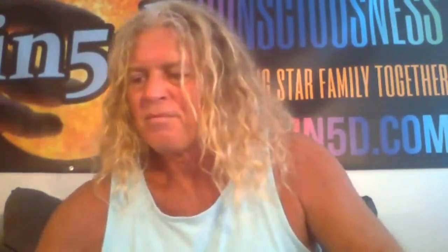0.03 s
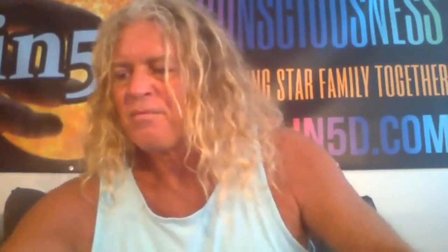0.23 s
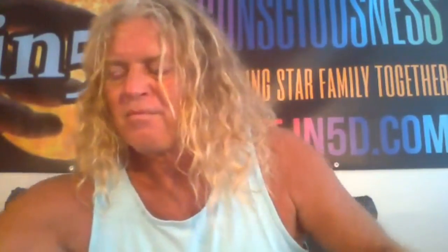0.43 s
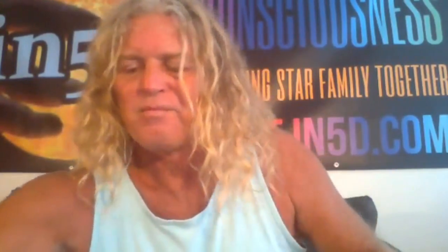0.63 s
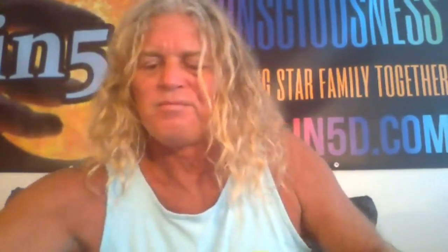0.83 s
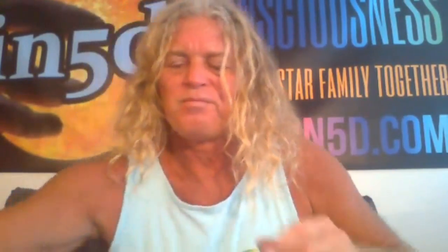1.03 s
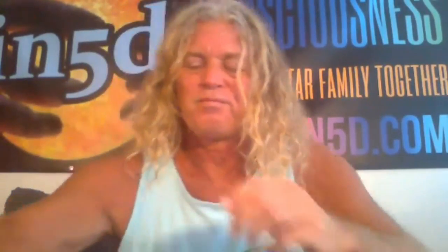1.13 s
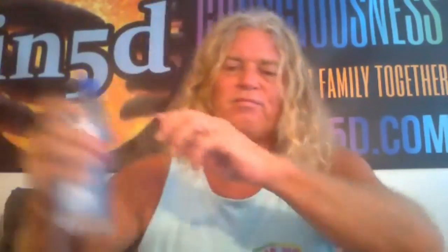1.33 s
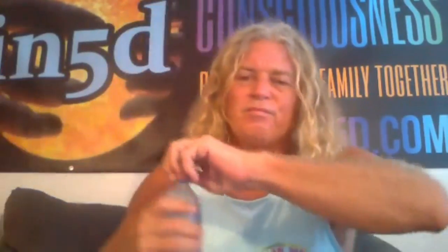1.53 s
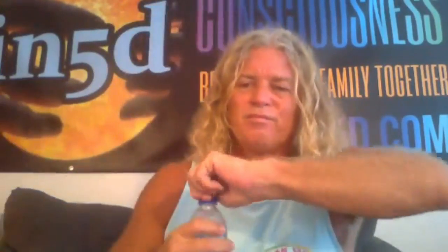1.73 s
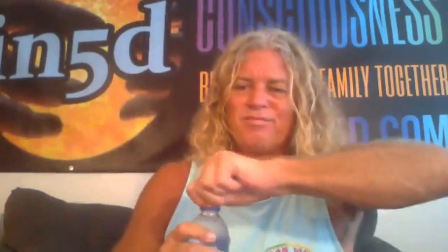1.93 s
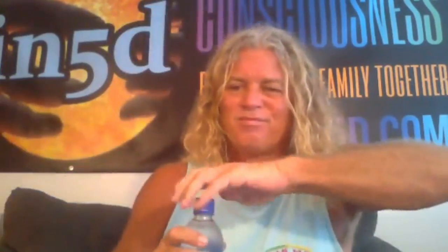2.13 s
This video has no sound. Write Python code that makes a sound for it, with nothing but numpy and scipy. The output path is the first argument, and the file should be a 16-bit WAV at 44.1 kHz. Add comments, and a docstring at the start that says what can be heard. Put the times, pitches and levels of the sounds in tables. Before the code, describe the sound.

A plastic bottle is picked up and opened near the microphone in a quiet room. A dull desk thud and scattered crackles come first, followed by the sharp snap of the seal and the cap's quick clicking twist.

```python
"""A faint rustle and a low boom sound over room noise as a plastic bottle is picked up from a desk.
Its thin wall buckles in crackles, its body rings in damped modes and a dent springs back. A soft thud
sets the desk swinging and rattling. Then the screw cap is twisted open: the seal snaps and the cap
chatters along its thread by stick-slip friction, all in a quiet room near a laptop microphone."""
import sys
import numpy as np
from scipy import signal
from scipy.fft import rfft, irfft, next_fast_len
from scipy.io import wavfile
from scipy.ndimage import uniform_filter1d, map_coordinates

SR = 44100
rng = np.random.default_rng(int(sys.argv[2]) if len(sys.argv) > 2 else 0)


def put_to_file(sound):
    """Save the sound as 16-bit audio at rate SR, in the file named by the first command-line argument."""
    columns = np.atleast_2d(sound).T  # one column per channel
    safe = np.clip(columns, -1, 1)
    whole_steps = np.round(safe * 32767)
    wavfile.write(sys.argv[1], SR, whole_steps.astype(np.int16))


N = 97020


def amp(db):
    """Amplitude ratio of a level in decibels."""
    return 10 ** (np.asarray(db) / 20)


def unit(x):
    """Normalisation to an rms of 1."""
    return x / np.sqrt(np.mean(x ** 2) + 1e-20)


def along(points, hz):
    """Interpolation of (frequency [Hz], value) points on a logarithmic frequency axis."""
    f, values = np.transpose(points)
    return np.interp(np.log(hz + 1), np.log(f + 1), values)


def envelopes(rows):
    """Amplitude envelopes, one per level column of (time [s], level [dB], ...); the end values hold."""
    times, *columns = np.transpose(rows)
    return [amp(np.interp(np.arange(N) / SR, times, db)) for db in columns]


def filtered(x, response):
    """Linear filtering: the spectrum is multiplied by a frequency response."""
    size = next_fast_len(len(x) + 8192)
    return irfft(rfft(x, size) * response(np.fft.rfftfreq(size, 1 / SR)), size)[:len(x)]


def resonance(f, hz, width_hz):
    """Band-pass response of a damped second-order resonator."""
    return 1j * f * width_hz / (hz * hz - f * f + 1j * f * width_hz)


def add(track, start, sound):
    """Superposition of a sound on a track from a start time in seconds."""
    part = track[round(start * SR):][:len(sound)]
    part += sound[:len(part)]


def ring(modes, rise_s, scatter_db, sign=1):
    """Free vibration after a blow: a sum of exponentially damped modes."""
    t = np.arange(SR) / SR
    partials = (sign ** k * amp(db + scatter_db * rng.normal() - 60 * t / t60)
                * np.sin(2 * np.pi * hz * t) for k, (hz, db, t60) in enumerate(modes))
    return (1 - np.exp(-t / rise_s)) * sum(partials)


def patchy_noise(spectrum, patchy_db):
    """Coloured noise, modulated by random patches of gain in time and frequency."""
    bins = signal.stft(rng.standard_normal(N), nperseg=512)[2]
    patches = uniform_filter1d(rng.standard_normal(bins.shape), size=14, axis=0)
    patches = uniform_filter1d(patches, size=6, axis=1)
    noise = signal.istft(bins * amp(patchy_db * unit(patches)), nperseg=512)[1][:N]
    return unit(filtered(noise, lambda f: amp(along(spectrum, f))))


def rustle():
    """Random amplitude modulation gives treble noise the grain of a rustle."""
    # Envelope of the rustle: (time [s], level [dB])
    levels = [(0, -57.5), (.06, -64.5), (.075, -50), (.105, -57.5), (.15, -48.5), (.2, -68), (.39, -68.5),
              (.55, -70.5), (.57, -68), (.7, -64), (.8, -71.5), (.85, -79.5), (1.0, -77.5), (1.03, -77),
              (1.06, -75.5), (1.4, -79), (1.46, -58), (1.56, -72.5), (1.62, -79), (2.2, -79.5)]
    # Spectral density of the rustle: (frequency [Hz], relative level [dB])
    spectrum = [(1470, -27), (2500, -16.5), (4340, -9), (5650, -4), (7080, -8), (9150, -0.5), (10100, -2.5),
                (15200, -6.5), (16000, -15)]
    grain_db, grain_s = 1.5, 0.0012
    grain = amp(grain_db * unit(uniform_filter1d(rng.standard_normal(N), size=round(grain_s * SR))))
    return envelopes(levels)[0] * unit(grain * patchy_noise(spectrum, patchy_db=2.0))


def room_noise():
    """The noise floor: a continuous spectrum with most of its power in the bass."""
    # Spectral density of the room noise: (frequency [Hz], relative level [dB])
    spectrum = [(15, -44), (35, -11), (52, -7), (66, 4), (90, -6.5), (150, -4), (300, -8.5), (450, -14),
                (840, -17.5), (1400, -20.5), (2760, -26), (4490, -36.5), (16000, -53.5)]
    # Envelope of the room noise: (time [s], level [dB])
    levels = [(0, -55.5), (.08, -59), (.59, -58), (.73, -57), (.95, -63), (1.2, -62.5), (1.79, -61),
              (1.91, -62), (2.2, -61.5)]
    return envelopes(levels)[0] * patchy_noise(spectrum, patchy_db=0.87)


def desk_boom(hz=127.6):
    """The desk booms on one low tone that comes and goes by slow amplitude modulation."""
    # Envelope of the boom: (time [s], level [dB])
    levels = [(0, -49.5), (.15, -79), (.33, -55), (.37, -66.5), (.55, -68), (.6, -48.5), (.65, -74),
              (.72, -56.5), (.76, -83), (.88, -60), (.92, -92), (1.07, -66), (1.14, -86), (1.3, -53.5),
              (1.4, -79), (1.46, -49), (1.51, -48), (1.56, -53), (1.6, -74), (1.7, -51.5), (1.8, -74),
              (1.86, -56.5), (1.95, -77), (2.06, -61), (2.2, -68.5)]
    return envelopes(levels)[0] * np.sqrt(2) * np.sin(2 * np.pi * hz * np.arange(N) / SR)


def wall_crackles():
    """Buckling of a thin shell: a click, then rough grains, excite a narrow ring and a broad crack."""
    # Buckles: (time [s], level [dB], ring frequency [Hz], ring bandwidth [Hz], crack re ring [dB],
    # crack lower edge [Hz], crack upper edge [Hz], hold [s], t60 [s])
    buckles = [(0.1563, -47, 3930, 500, 9.5, 630, 5500, 0.0015, 0.16),
               (0.1566, -40.5, 8760, 1500, 7, 1790, 15400, 0.0011, 0.083),
               (.3700, -56.5, 437, 193, 2.5, 198, 556, 0.037, 0.039),
               (0.5545, -62.5, 2580, 900, -2.5, 1500, 7140, 0.0016, 0.12),
               (0.658, -68, 6060, 900, -0.5, 4500, 14100, 0.0075, 0.023),
               (0.7118, -47.5, 1117, 298, -8.5, 613, 2330, 0.0009, 0.066),
               (0.725, -62.5, 2230, 199, -20, 1000, 3000, 0.021, 0.057),
               (1.105, -51, 8030, 700, 3, 7800, 16400, 0.0053, 0.018),
               (1.109, -77, 9300, 700, 12.5, 6400, 16200, 0.067, 0.035),
               (1.1513, -64, 10300, 900, -3, 6000, 14000, 0.0014, 0.029),
               (1.192, -52.5, 9700, 905, -16, 6000, 12100, 0.0025, 0.01),
               (1.2055, -54, 10760, 1490, -0.5, 6100, 12900, 0.0008, 0.0099),
               (1.229, -63.5, 2070, 790, 2, 1200, 3080, 0.0018, 0.016),
               (1.244, -68.5, 3380, 900, -2, 3000, 11200, 0.0015, 0.047),
               (1.413, -46.5, 1500, 880, -24, 1000, 3000, 0.0025, 0.006),
               (1.4163, -25, 1620, 865, -13, 5000, 16000, 0.00044, 0.0057),
               (1.4170, -44, 258, 160, -2, 220, 950, 0.013, 0.073),
               (1.4180, -38.5, 1640, 770, -7, 2200, 12400, 0.018, 0.078),
               (1.499, -50, 2160, 900, -20, 2000, 3970, 0.009, 0.013),
               (1.511, -50.5, 2280, 1190, -8.5, 2000, 7066, 0.0089, 0.071),
               (1.7698, -51, 2400, 910, -3.5, 1500, 7000, 0.003, 0.014),
               (1.774, -45, 2990, 400, -2.5, 1420, 9600, 0.0026, 0.11),
               (1.7897, -32.5, 2190, 806, -11, 1500, 6680, 0.0023, 0.0062),
               (1.9270, -35.5, 6360, 900, -4.5, 4000, 13300, 0.0017, 0.015),
               (2.01, -45.5, 970, 530, -3.5, 4650, 5420, 0.01, 0.11),
               (2.116, -63.5, 870, 510, -18, 520, 2090, 0.068, 0.028),
               (2.177, -54.5, 1800, 1180, -6, 1050, 4000, 0.013, 0.0055),
               (2.1843, -34, 5440, 590, -8, 1890, 5740, 0.0024, 0.022),
               (2.1970, -52.5, 5000, 890, 8, 1920, 8900, 0.0018, .03)]
    # Resonances of the wall: (frequency [Hz], bandwidth [Hz], level re the flat spectrum [dB])
    wall_modes = [(870, 50, 7), (1510, 67, 7.5), (2540, 130, 9), (3220, 310, 2), (4000, 280, 0.5),
                  (5680, 1300, 6.5), (8960, 980, 9), (9750, 1500, 5), (11800, 2300, 3.5)]
    scatter_db, click_db = 2, 12
    out, t = np.zeros(N), np.arange(SR // 4) / SR
    wall = lambda f: np.sqrt(1 + sum(np.abs(amp(db) * resonance(f, hz, width)) ** 2
                                     for hz, width, db in wall_modes))
    for start, db, hz, width, crack_db, bottom, top, hold, t60 in buckles:
        ring_band = lambda f: resonance(f, hz, width) ** 2
        crack_band = lambda f: wall(f) / (1 + (f / top) ** 8) / (1 + (bottom / (f + 1)) ** 4)
        decay = amp(-60 * np.maximum(t - hold, 0) / t60)
        grains = rng.standard_normal((2, len(t))) * amp(scatter_db * rng.exponential(size=(2, len(t))))
        for force, band, level_db in zip(grains, (ring_band, crack_band), (db, db + crack_db)):
            steady_rms = np.std(filtered(force, band))
            force[20] = amp(click_db)  # the opening click
            add(out, start, amp(level_db) * filtered(force * decay, band) / steady_rms)
    return out


def dent_pop():
    """Snap-through: a dent springs back once and leaves the wall ringing."""
    # Modes of the dent: (frequency [Hz], relative level [dB], t60 [s])
    modes = [(907, -6.5, 0.17), (1450, -4, 0.067), (1936, 3.5, 0.078), (2000, -4, 0.11), (2166, 2.5, 0.078),
             (2630, 2, 0.06), (3460, 1.5, 0.043), (4090, 6, 0.042)]
    out = np.zeros(N)
    add(out, start=0.1566, sound=amp(-38.5) * ring(modes, rise_s=0.0005, scatter_db=1.2, sign=-1))
    return out


def knocks_and_clicks():
    """Modal decay: each knock or click rings at its own pitch, and its higher modes die faster."""
    # Low hollow knocks and short high ringing clicks:
    # (time [s], level [dB], pitch [Hz], rise [s], t60 of the lowest mode [s], upper mode gain [dB])
    knocks = [(.1570, -50.5, 433, 0.0018, 0.12, 10.5), (0.714, -35.5, 392, 0.00053, 0.03, 2.5),
              (.724, -45, 323.4, 0.006, 0.15, 1.5), (1.417, -38.5, 221, 0.00098, 0.098, 1.5),
              (1.51, -26.5, 1857, 0.00075, 0.012, 8.5), (1.5254, -44, 1940, .0004, 0.0099, 3),
              (1.701, -57.5, 228.5, 0.0057, 0.2, -1.5), (1.997, -30.5, 2127, .0015, 0.039, -26)]
    # Modes of each knock or click: (frequency ratio [1], relative level [dB])
    mode_ratios = [(1, 4), (1.5, -5), (1.95, -10.5), (2.8, -14.5), (3.1, -3), (5.7, -10)]
    out = np.zeros(N)
    for start, db, hz, rise_s, t60, upper_db in knocks:
        modes = [(hz * ratio, mode_db + upper_db * (k > 0), t60 / ratio ** 1.9)
                 for k, (ratio, mode_db) in enumerate(mode_ratios)]
        add(out, start, amp(db) * ring(modes, rise_s, scatter_db=-2.5))
    return out


def desk_thud():
    """After a soft thud the desk swings in fading bursts; forced vibration makes something loose buzz."""
    # Swings of the desk: (time [s], duration [s], peak level [dB], mid-swing frequency [Hz])
    swings = [(0.381, 0.068, -18.5, 113.7), (0.44, 0.059, -27.5, 113), (0.492, .052, -36, 109),
              (.553, 0.031, -41, 114)]
    glide_hz_per_s, rattle_exponent = 500, 0.53
    thud = np.zeros(N)
    for start, length, db, hz in swings:
        t = np.arange(round(length * SR)) / SR
        cycles = hz * t + glide_hz_per_s * t * (t - length) / 2
        add(thud, start, amp(db) * np.sin(np.pi * t / length) ** 1.46 * np.sin(2 * np.pi * cycles))
    buzz = unit(filtered(rng.standard_normal(N), lambda f: resonance(f, hz=290, width_hz=290) ** 2))
    swing_amplitude = np.abs(signal.hilbert(thud))
    return thud + amp(-42) * swing_amplitude ** rattle_exponent * buzz


def thread_friction():
    """Stick-slip friction: small uneven slips along the thread drive the cap's resonances."""
    # Resonances of the rubbing cap: (frequency [Hz], bandwidth [Hz], relative level [dB])
    modes = [(2060, 470, 0), (3840, 930, -4), (5720, 800, 1.5), (6730, 670, 7), (8420, 440, 3),
             (9100, 3100, -9.5)]
    # Envelopes of the twist: (time [s], low resonance level [dB], upper resonances level [dB])
    twist = [(1.787, -49, -66), (1.806, -41, -57), (1.83, -52, -70), (1.865, -53, -52), (1.89, -49.5, -52),
             (1.903, -56.5, -52.5), (1.914, -41, -42.5), (1.947, -42.5, -54.5), (1.955, -61, -57),
             (1.985, -48.5, -70), (1.993, -60, -58.5), (1.998, -45.5, -92), (2.027, -50.5, -84),
             (2.038, -55.5, -90), (2.08, -66, -80)]
    slips_per_s, scatter_db = 850, 1.5
    sways_per_s, sway_depth = 70, 0.05
    slips = (rng.random(N) < slips_per_s / SR) * rng.choice([-1, 1], size=N)
    slips = slips * amp(scatter_db * rng.standard_normal(N))
    force = unit(slips) + 0.56 * rng.standard_normal(N)
    # The fingers bend the low resonance: a random crossfade between a flat and a sharp tuning.
    wander = map_coordinates(rng.standard_normal(200), [np.arange(N) * sways_per_s / SR])
    sway = np.pi / 4 * (1 + np.tanh(wander))
    low_hz, low_width, _ = modes[0]
    low = np.zeros(N)
    for share, tuning in ((np.cos(sway), 1 - sway_depth), (np.sin(sway), 1 + sway_depth)):
        low += filtered(force * share, lambda f: resonance(f, low_hz * tuning, low_width) ** 2
                        + amp(-6) * resonance(f, hz=2000, width_hz=1100))
    upper = filtered(force, lambda f: sum((-1) ** k * amp(db) * resonance(f, hz, width) ** 2
                                          for k, (hz, width, db) in enumerate(modes[1:])))
    start, end = twist[0][0] - 0.01, twist[-1][0] + 0.019
    low_gain, upper_gain = envelopes([(start, -120, -120), *twist, (end, -120, -120)])
    return low_gain * unit(low) + upper_gain * unit(upper)


def cap_snaps(cutoff_hz=1270):
    """Impulses ring the cap's modes in sharp, thin clicks, with the bass filtered out."""
    # Clicks, the first being the breaking seal: (time [s], level [dB], upper mode gain [dB])
    snaps = [(1.7950, -10.5, -2.5), (1.8906, -41, -7), (1.9077, -34, -4), (1.917, -27, -3),
             (1.9225, -44, -23), (1.9280, -28, 3.5), (1.9420, -32, -2), (2.0035, -46, 8),
             (2.0140, -32.5, 8), (2.0205, -36.5, -1)]
    # Modes of the cap: (frequency [Hz], relative level [dB], t60 [s])
    cap_modes = [(2104, 4, 0.014), (2340, 9.5, 0.0021), (2810, -15, 0.021), (3994, -13, 0.03),
                 (5240, -8, 0.0063), (5820, -12, 0.009), (9000, -30, 0.0073)]
    out = np.zeros(N)
    for start, db, upper_db in snaps:
        modes = []
        for k, (hz, mode_db, t60) in enumerate(cap_modes):
            detune, gain_db = (0.011, 0) if k < 2 else (0.037, upper_db)
            modes.append((hz * (1 + detune * rng.normal()), mode_db + gain_db, t60))
        add(out, start, amp(db) * ring(modes, rise_s=0.00024, scatter_db=0.7))
    return filtered(out, lambda f: 1 / (1 + (cutoff_hz / (f + 1)) ** 4))


def reverberation(x):
    """Absorption in a small soft room makes the diffuse tail decay faster at high frequencies."""
    # Reverberation time: (frequency [Hz], t60 [s])
    decay_times = [(200, 0.7), (2000, 0.19), (12000, 0.066)]
    hz, t, bins = signal.stft(rng.standard_normal(SR // 3), SR, nperseg=256)
    tail = signal.istft(bins * amp(-60 * t / along(decay_times, hz)[:, None]), SR, nperseg=256)[1]
    delayed = np.pad(x, (200, 0))
    return signal.fftconvolve(delayed, tail / np.linalg.norm(tail))[:N]


def scene():
    """Superposition of the bottle, its reverberation, the desk, the rustle and the room noise."""
    bottle = wall_crackles() + knocks_and_clicks() + dent_pop() + cap_snaps() + thread_friction()
    background = rustle() + room_noise()
    return (bottle + amp(-17) * reverberation(bottle) + desk_boom() + desk_thud() + background)[None]


def record(dry):
    """The microphone's frequency response colours the treble and ends at a band limit."""
    # Dips of the microphone housing: (frequency [Hz], gain [dB])
    housing = [(2800, -0.5), (3450, -1.5), (3900, 0), (6800, -2), (7400, -5.5), (8000, -3.5)]
    limit_hz = 15900
    return filtered(dry[0], lambda f: amp(along(housing, f)) * (f < limit_hz))[None]


dry = scene()
out = record(dry)
put_to_file(out)
```